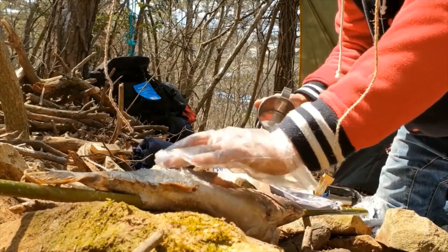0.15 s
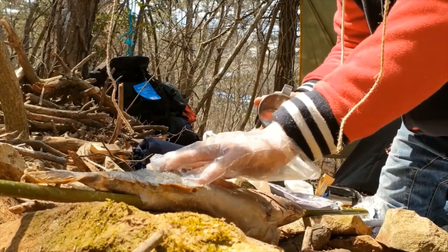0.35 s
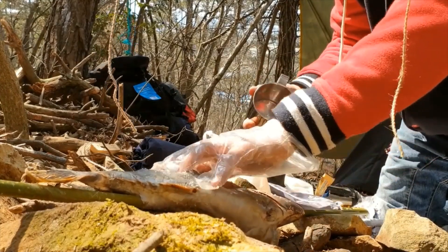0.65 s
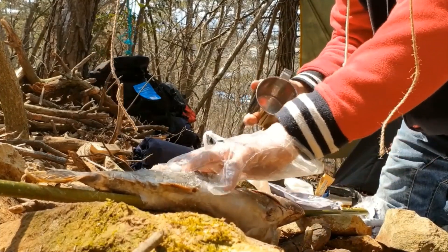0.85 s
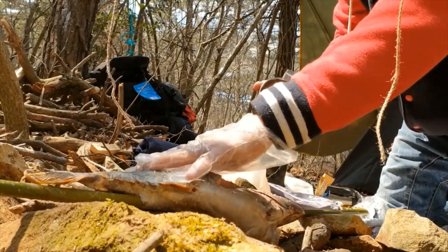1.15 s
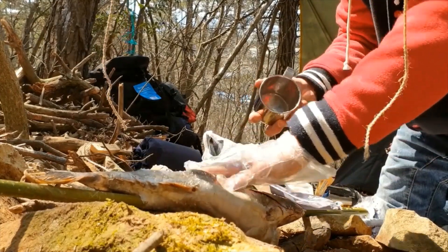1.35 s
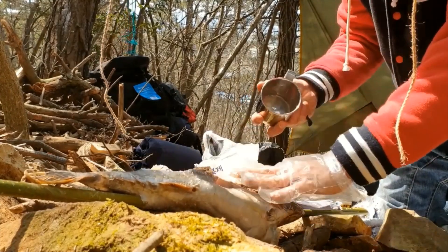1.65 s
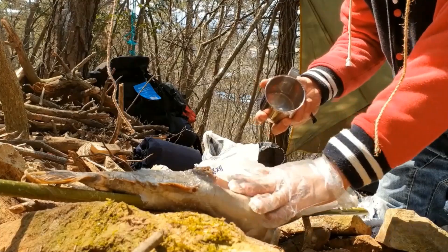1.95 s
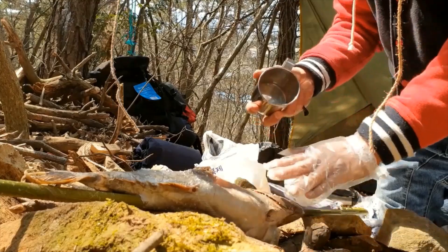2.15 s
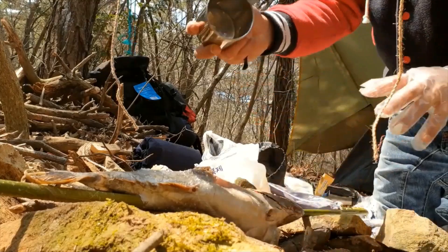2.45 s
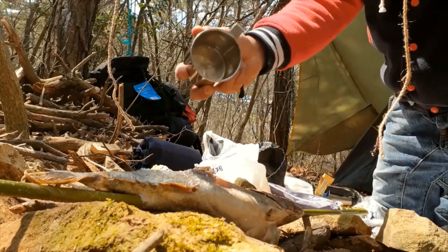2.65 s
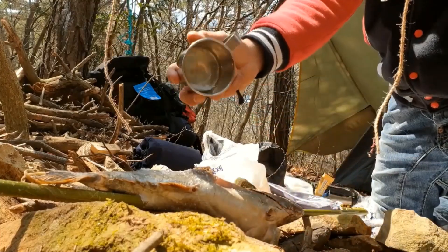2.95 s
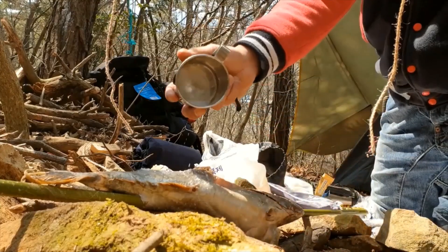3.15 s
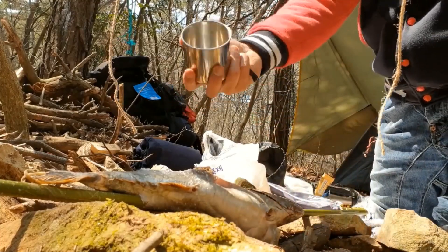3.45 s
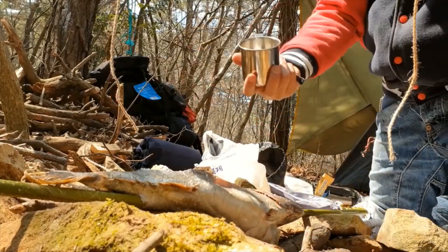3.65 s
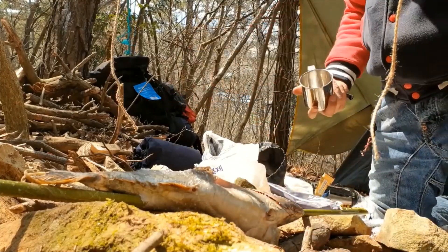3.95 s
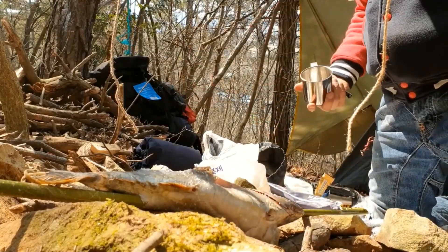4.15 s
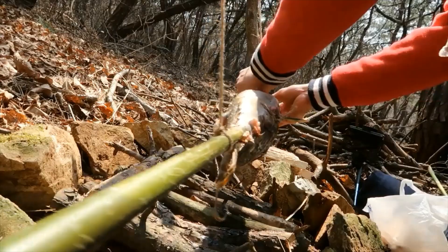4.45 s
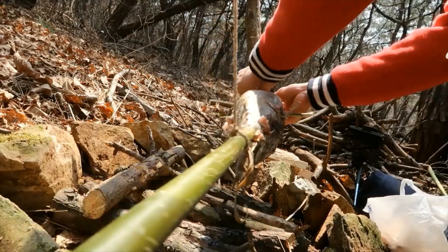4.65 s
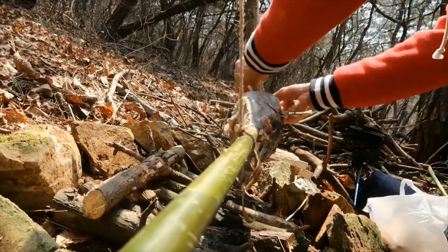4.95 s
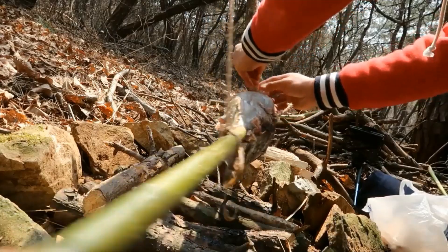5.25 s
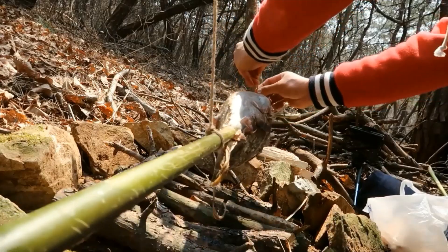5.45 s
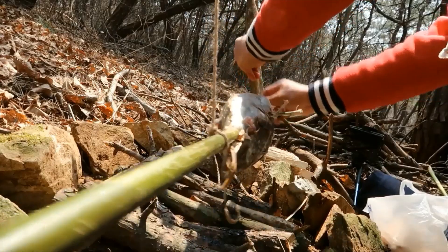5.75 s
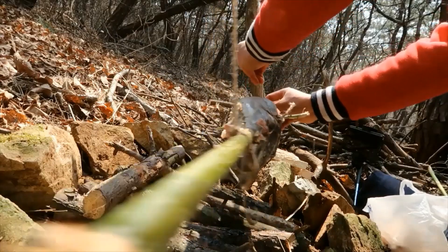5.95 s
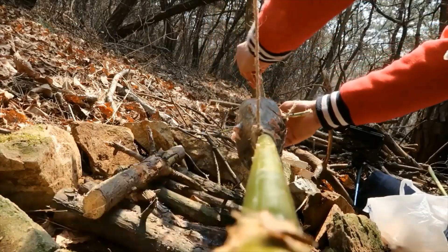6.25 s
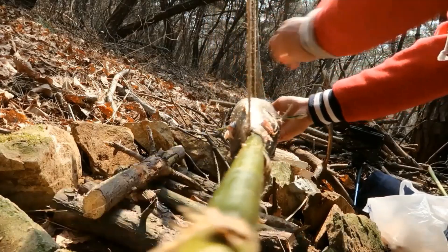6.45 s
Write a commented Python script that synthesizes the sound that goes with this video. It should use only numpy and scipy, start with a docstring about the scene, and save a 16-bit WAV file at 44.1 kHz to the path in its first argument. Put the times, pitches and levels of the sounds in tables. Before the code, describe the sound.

A thin plastic glove rustles and crackles over a fish, a steel cup clinks, then steady outdoor rushing with a few bird chirps.

```python
"""In a bare wood, a thin plastic glove rubs a fish on a spit, and its creases rustle and snap.
A steel cup rings as it is knocked, wind thumps mostly on the right microphone, and birds whistle
among the trunks. After a quick fade we hear the wood from a second spot, where a steady far rush
covers everything but a few chirps, a faint rustle and one cracking twig."""
import sys
import numpy as np
from scipy import signal
from scipy.fft import rfft, irfft, next_fast_len
from scipy.io import wavfile

SR = 44100
rng = np.random.default_rng(int(sys.argv[2]) if len(sys.argv) > 2 else 0)


def bounce(signal):
    """Save signal as a 16-bit WAV file at the path given by the first command-line argument."""
    frames = np.transpose(np.atleast_2d(signal))
    limited = np.clip(frames, -1, 1)
    pcm = np.round(limited * 32767).astype(np.int16)
    wavfile.write(sys.argv[1], SR, pcm)


N = 291501

# Levels are set before each source's own gain. pan_db is left minus right.
# Tone of the still air: pitch_hz, level_db
AIR_SPECTRUM = [(18, -32), (30, -1.5), (124, -1.5), (295, -9.5), (600, -18), (1040, -13.5), (1860, -38),
                (2610, -28.5), (3980, -35.5), (6380, -26.5), (8300, -69.5), (14800, -25), (16000, -38)]
# How alike the air sounds left and right (1 is the same): pitch_hz, likeness
AIR_LIKENESS = [(60, 1), (240, 0.92), (950, -0.096), (3770, 0.062), (15000, 0.064)]
# Far rush, a roar plus a hiss: time_s, roar_db, hiss_db
RUSH_LEVELS = [(4.6, -40.5, -52.5), (5.7, -40, -53), (6.25, -40, -51), (6.61, -40, -51)]
# Tone of the roar: pitch_hz, level_db
ROAR_SPECTRUM = [(20, -8), (96, 1), (241, -6), (337, -20), (542, -7.5), (1030, -8), (1570, -14),
                 (2320, -17.5), (2990, -24), (6540, -38), (8300, -43.5), (10000, -74.5), (16000, -84)]
# Tone of the hiss: pitch_hz, level_db
HISS_SPECTRUM = [(18, -28), (30, -22.5), (112, -24), (239, 0.5), (449, -0.5), (526, -0.5), (1250, -0.5),
                 (11700, -10), (14800, -19), (16000, -44)]

# Light air on both microphones: time_s, level_db
BREEZE_LEVELS = [(0, -60), (.9, -69), (1.3, -52.5), (2.1, -57.5), (2.5, -66), (3.3, -70), (3.9, -69.5),
                 (4.5, -62.5)]
# Gusts on the right microphone: full_at_s, rise_s, hold_s, fall_s, level_db
GUST_SWELLS = [(0, .01, .003, 0.042, -43.5), (.112, 0.012, 0.17, .02, -50), (.304, 0.035, .002, 0.018, -38),
               (.512, 0.044, 0.0038, 0.067, -45.5), (.63, .05, 0.0052, 0.12, -66),
               (.742, 0.052, .003, 0.1, -53.5), (1.114, 0.041, 0.0082, 0.029, -44.5),
               (1.22, 0.05, .003, 0.032, -53), (1.432, 0.052, .003, 0.062, -50),
               (1.582, 0.034, .003, 0.087, -48), (1.654, .03, 0.11, 0.031, -52.5),
               (1.824, 0.024, 0.092, .015, -48.5), (2.042, .1, .003, 0.068, -50),
               (2.172, 0.035, .003, 0.038, -52), (2.284, 0.088, 0.24, .1, -61),
               (2.81, 0.05, .018, .14, -61), (3.024, .025, .01, 0.037, -44),
               (3.07, 0.018, 0.2, .036, -48.5), (3.482, .018, .002, 0.02, -62),
               (3.558, .06, .003, .07, -61), (3.934, .2, .003, .03, -52.5),
               (3.968, 0.044, 0.0024, 0.038, -44.5), (4.074, .065, .002, .03, -43),
               (4.184, 0.17, 0.0018, 0.013, -53.5), (4.282, .042, 0.043, 0.2, -49.5)]
# Tone of the wind: pitch_hz, level_db
WIND_SPECTRUM = [(12, -33), (20, 0.5), (75, -3), (168, -13), (271, -19.5), (315, -23), (400, -30.5),
                 (520, -33), (880, -120)]
# Single pushes of air on the right microphone: start_s, level_db, pitch_hz
WIND_THUMPS = [(0.29, -54, 62), (0.508, -39, 72.6), (1.417, -32, 78.1), (1.46, -30.5, 118),
               (1.658, -30, 76), (1.818, -29.5, 75), (2.04, -32, 64.6), (2.171, -41, 96.9),
               (3.018, -36, 83), (3.248, -34, 88), (3.971, -29, 107), (4.007, -34, 57.3),
               (4.039, -40, 78.1), (4.058, -36, 79), (4.288, -35, 40.4)]

# Bird notes: start_s, length_s, first_hz, last_hz, closing_flick_hz, end_db, swell_db
BIRD_NOTES = [(2.355, 0.098, 3900, 2720, 0, -73, -3), (3.108, 0.075, 3770, 3400, 0, -76, -6),
              (3.236, 0.074, 3880, 3700, 0, -75, -3), (3.564, 0.076, 3800, 2950, 0, -70, 4),
              (3.65, 0.038, 3680, 3540, -250, -72.5, -7), (3.811, 0.056, 4200, 4870, -460, -62.5, 10),
              (3.863, 0.092, 3800, 4180, -400, -63.5, 2.5), (4.07, 0.12, 3550, 4660, -780, -59.5, 11),
              (4.195, .012, 5160, 4250, 0, -59, 3), (4.208, 0.025, 4400, 5030, 0, -67.5, -4),
              (4.218, 0.079, 3750, 3030, 0, -79.5, -6), (4.365, 0.14, 3620, 5380, -1700, -57, 8.5),
              (5.36, 0.032, 3600, 6350, 0, -56, 5), (5.39, .118, 6200, 6650, -2000, -59.5, 1.5),
              (5.44, 0.082, 3770, 4760, 0, -54.5, 1.5), (5.537, 0.036, 6280, 3650, 8, -52, 11),
              (5.77, 0.065, 3800, 4210, 0, -58, 8), (6.04, 0.056, 3900, 4140, -2, -60, 4),
              (6.5, 0.082, 6750, 7200, 0, -65.5, -4), (6.532, 0.076, 3520, 3620, 0, -47.5, 11)]
# The tones in a bird's voice: pitch_multiple, level_db
BIRD_TONES = [(1, 0), (1.5, -20), (2, -21)]
# A faint rustle at the spit: full_at_s, rise_s, hold_s, fall_s, level_db
RUSTLE_SWELLS = [(5.725, .04, .05, .04, -74)]
# The bursts of one twig crack: start_s, level_db, pitch_hz, decay_s, pan_db
TWIG_BURSTS = [(6.269, -41, 4000, 0.033, -4), (6.2743, -38.5, 5370, 0.013, 8),
               (6.275, -42, 9200, 0.012, -3), (6.276, -31, 2800, 0.062, -3), (6.289, -29, 800, 0.014, -1),
               (6.291, -35, 2600, 0.061, 0)]

# Knocks on the cup: start_s, level_db, extra_air_note_db, extra_rim_db, pan_db
CUP_KNOCKS = [(2.5256, -63.5, -2, -4, -8), (2.875, -74, 0, -17, -2.5), (2.976, -64, -12, -8, 3),
              (2.999, -63.5, -9, 2, 0.5), (3.022, -64, -7, -14, -5), (3.045, -66, -6, -4, -6),
              (3.6172, -54, 5, 11.5, 4.5), (3.6423, -65, 6, -3, -5), (3.697, -71.5, 17.5, 1, 1),
              (3.7042, -77, 7, 10, -7), (3.7152, -78, 9, 1, 0), (4.3518, -68, 9.5, -2, 2)]
# The cup's tones (first its air note, last four its rim): pitch_hz, level_db, decay_s
CUP_TONES = [(1030, 1, .045), (1630, -7, .03), (2280, 0, .035), (3070, -2, .035), (3800, -9, .03),
             (5950, -10, .035), (7000, -12, .03)]

# Tone of the plastic film: pitch_hz, level_db
FILM_SPECTRUM = [(260, -38), (450, -5.5), (625, -5.5), (794, -16), (1210, -8), (1530, -4.5), (3050, -4.5),
                 (6340, -0.5), (8290, -9), (15100, -4), (16000, -10)]
# Rubs of the glove: full_at_s, rise_s, hold_s, fall_s, rustle_db, extra_body_db, extra_sizzle_db
GLOVE_STROKES = [(0.013, 0.019, 0.12, 0.035, -48, -1, -1.5), (0.192, 0.033, 0.013, 0.11, -45.5, 0, 0.5),
                 (0.384, 0.053, 0.021, 0.076, -46.5, -2.5, -2), (.454, .01, .005, 0.088, -52.5, 2.5, -3),
                 (0.55, 0.051, .04, .1, -51, 0.5, 0.5), (0.676, .1, 0.036, 0.054, -63, 0, 2),
                 (0.76, 0.046, 0.0093, 0.18, -60, -20, -3), (0.901, 0.075, 0.061, .07, -49.5, -0.5, 0.5),
                 (1.059, 0.1, .005, .09, -53.5, 1, 1.5), (1.141, 0.054, .005, 0.084, -46, -3, 0),
                 (1.3, 0.19, 0.032, .05, -44.5, 1, 1.5), (1.344, 0.044, 0.011, 0.21, -39, -2, -2),
                 (1.511, .05, .01, 0.052, -52.5, 2, 0.5), (1.665, 0.098, 0.0026, 0.073, -52, 3.5, -2),
                 (1.779, 0.025, .05, .05, -46.5, -3.5, -3), (1.853, 0.028, .003, 0.1, -40.5, -9.5, -6),
                 (1.922, 0.092, 0.011, .14, -43.5, -1, 0), (2.0, 0.065, 0.11, 0.047, -51.5, 0, -5),
                 (2.246, 0.092, 0.18, 0.095, -58.5, -4, -4), (2.531, 0.031, 0.0027, 0.018, -49, -13, 4.5),
                 (2.565, .03, 0.12, 0.059, -68, -13, 5.5), (2.698, .01, 0.0018, .01, -66, -25, -1),
                 (2.76, 0.071, .002, 0.011, -70, -20, 4), (2.868, 0.014, 0.022, 0.04, -56.5, -35, 9),
                 (2.978, .03, 0.021, .02, -61, -21, 1), (3.023, 0.014, .002, 0.022, -47.5, -36, 4),
                 (3.095, 0.033, .003, 0.024, -61, -8, -2), (3.139, 0.022, .003, 0.049, -52.5, -30, 3.5),
                 (3.306, 0.11, .002, 0.038, -61.5, -22, -2), (3.449, 0.0067, .002, 0.013, -62, -25, -4),
                 (3.6, .085, .01, .02, -62, -25, -10), (3.617, 0.01, .002, .01, -48.5, -13, -2.5),
                 (3.627, .01, 0.081, 0.082, -61, -3, -1), (3.887, 0.077, 0.068, 0.074, -60.5, -5, -23),
                 (4.09, 0.21, .003, .08, -69, 1, -15), (4.194, .008, 0.069, 0.1, -64, -3, -13),
                 (4.354, 0.011, 0.0034, 0.016, -42, -35, -8), (4.389, .01, .003, 0.092, -60, -3, -5),
                 (4.482, .022, .003, 0.048, -68, -22, -22)]
# The glove between rubs: body_db, rustle_db, sizzle_db
GLOVE_REST = [-91, -87, -77]
# Where the rubbing is heard: time_s, pan_db
GLOVE_POSITION = [(0, -.5), (2.1, -2), (2.7, -1.5), (4.5, -2.5)]
# The loudest creases snapping: start_s, level_db, extra_sizzle_db, pan_db
CREASE_SNAPS = [(.0097, -31, -17, .5), (.0578, -37, -15, 4), (0.069, -38, 4, 0), (.111, -35, -8, -2),
                (.134, -37, -12, 0), (.1807, -33, 5, 1), (0.2048, -31, 0, 1), (.2324, -39, -7, -2),
                (.2566, -37, 4, 3), (0.3581, -32.5, 2, -1.5), (.374, -31, -9, 3), (.409, -31, 2, 2),
                (0.4542, -27, -2, 0), (.459, -30, 3, 3), (0.576, -37, -2, -.5), (.6516, -40.5, 0, 3),
                (0.7058, -44.5, -4, 17.5), (0.7713, -35.5, -7, -5), (.7936, -46, -3, -5),
                (.831, -47, -3, -4), (0.857, -39.5, -14, -1.5), (.9144, -35, -3, 1), (0.9568, -36, 1, -1.5),
                (1.0372, -39, -10, -8), (1.1847, -44, -8, 1), (1.223, -32, -13, .5), (1.3633, -28, -15, -1),
                (1.4344, -35, -16, -2), (1.4604, -35, -19, -1.5), (1.539, -36, 3, -4), (1.596, -38, 4, -1),
                (1.616, -39, -10, -10), (1.6641, -29, -9, -5), (1.7406, -34.5, -6, -1),
                (1.7829, -36, -18, -12), (1.798, -27.5, -5, 0), (1.8496, -28, -14, -6),
                (1.857, -30, -17, -8), (1.873, -32, -11, -2), (1.9096, -40, -5.5, -4),
                (2.2414, -44.5, 14, -4), (2.2628, -37.5, 1, 0), (2.289, -40, -7, -2.5),
                (2.309, -41.5, -2, -5), (2.3607, -38, -3, -1), (2.3975, -39, -4, -10),
                (2.5258, -40, 19.5, -1), (2.5985, -45, -13, -11), (2.697, -46.5, -3, -8),
                (2.7517, -52, -1, -15), (2.867, -55, 19, 0), (2.9191, -49, 0, -13),
                (3.0244, -38.5, 13.5, -3), (3.13, -50, 8, 0), (3.2824, -54, -10, -4), (3.296, -44.5, 0, -9),
                (3.4475, -49.5, -3, -14.5), (3.6175, -30.5, 4, -3), (3.6445, -38, -17, 2),
                (3.7037, -45, -1, 1), (4.3515, -34, -9, 2.5)]

# A decay is the time a sound takes to drop by 60 dB.
FOLD_DECAY_S, SNAP_DECAY_S, TICK_DECAY_S, SNAP_RISE_S = .005, .01, .0025, .00086
BODY_HZ, RUSTLE_HZ, SIZZLE_HZ = 1800, 6000, 12000   # the glove's low, middle and high parts
SNAP_BODY_DB, GUST_LEFT_DB, GUST_FLUTTER_DB, BREEZE_DEEP_DB = -26, -30, -7.5, -13.5
FLICK_S, FLICK_LOSS_DB = .013, 6   # the quick bend that ends some bird notes
SWELL_DB = 15   # change in level over one rise or fall time
FADE_OUT_S, FADE_IN_S = (4.505, 4.535), (4.54, 4.572)
CUTOFF_HZ = 16550


def amp(db):
    """Turn decibels into a gain to multiply by."""
    return 10 ** (np.asarray(db) / 20)


def rms_one(x):
    """Scale a signal so that its average strength (rms) is 1."""
    return x / np.sqrt(np.mean(x ** 2) + 1e-20)


def filtered(x, order, hz, kind):
    """Keep the lows, the highs or one band of a sound."""
    return signal.sosfilt(signal.butter(order, hz, kind, fs=SR, output="sos"), x)


def in_time(rows):
    """Join a table's points in time into one curve per column."""
    times, *columns = np.transpose(rows)
    return [np.interp(np.arange(N) / SR, times, column) for column in columns]


def at_hz(points, hz):
    """Read a table's value at any pitch."""
    pitches, values = np.transpose(points)
    return np.interp(np.log(hz), np.log(pitches), values)


def sides(pan_db):
    """Left and right gains that lie pan_db apart."""
    return amp(np.array([pan_db / 2, -pan_db / 2]))


def drift(rate_hz):
    """A smooth random wobble of typical size 1, worked out every 40th sample."""
    r = np.exp(-80 * np.pi * rate_hz / SR)
    slow = signal.lfilter([1], [1, -2 * r, r * r], rng.standard_normal(N // 40 + 2002))[2000:]
    return np.interp(np.arange(N) / 40, np.arange(len(slow)), rms_one(slow))


def bands(spectrum, low_hz, count):
    """Stereo noise in half-octave bands: yields each centre pitch and its band."""
    white = rng.standard_normal((2, 2, N))
    for k, low in enumerate(low_hz * 2 ** (np.arange(count) / 2)):
        high = min(low * np.sqrt(2), .45 * SR)
        hz = np.sqrt(low * high)
        yield hz, amp(at_hz(spectrum, hz)) * filtered(white[k % 2], 2, [low, high], "band")


def coloured(spectrum):
    """Two unrelated noises with the given tone, each of strength 1."""
    size = next_fast_len(N)
    hz = np.maximum(np.fft.rfftfreq(size, 1 / SR), 1)
    white = rfft(rng.standard_normal((2, size)))
    noise = irfft(white * amp(at_hz(spectrum, hz)), size)[:, :N]
    return np.array([rms_one(side) for side in noise])


def swells(rows):
    """The power of each swell as it rises, holds and falls, at every 32nd sample."""
    t = np.arange(N // 32 + 2) * 32 / SR
    full_at, rise, hold, fall, db = np.transpose(rows)[:5, :, None]
    before = np.maximum((full_at - t) / rise, 0)
    after = np.maximum((t - full_at - hold) / fall, 0)
    return amp(2 * np.maximum(db - SWELL_DB * (before + after), -150))


def summed(power):
    """Add the swells' powers into one loudness curve."""
    return np.sqrt(np.interp(np.arange(N) / 32, np.arange(power.shape[1]), power.sum(axis=0)))


def ring(clicks, hz, decay_s):
    """Each click starts a pure tone that dies away."""
    r, step = amp(-60 / (decay_s * SR)), 2 * np.pi * hz / SR
    return signal.lfilter([0, np.sin(step)], [1, -2 * r * np.cos(step), r * r], clicks + 1e-18)


def still_air():
    """Faint far rumble and hiss, more alike left and right in the bass."""
    out, together = 0, drift(3.5)
    for hz, (middle, side) in bands(AIR_SPECTRUM, 30.17, count=18):
        alike = at_hz(AIR_LIKENESS, hz)
        stereo = np.sqrt(1 + alike) * middle + np.sqrt(1 - alike) * side * [[1], [-1]]
        out += amp(1.5 * (.24 * together + drift(22))) * stereo
    return amp(-57.5) * rms_one(out)


def far_rush():
    """A wavering roar shared by both sides, and a hiss that is flipped in sign on the right."""
    roar_db, hiss_db = in_time(RUSH_LEVELS)
    noise = coloured(ROAR_SPECTRUM)[0]
    bass, upper = (rms_one(filtered(noise, 4, 340, kind)) for kind in ("low", "high"))
    roar = amp(roar_db) * (amp(.64 * drift(8.4)) * upper + amp(1.5 + 1.4 * drift(5.9)) * bass)
    hiss = amp(hiss_db) * coloured(HISS_SPECTRUM)[0]
    return np.array([roar + hiss, roar - hiss])


def wind():
    """Air rumbles and flutters on the microphones; single pushes thump the right one."""
    gust = summed(swells(GUST_SWELLS)) * amp([[GUST_LEFT_DB], [0]])
    breeze = amp(*in_time(BREEZE_LEVELS)) / np.sqrt(2)
    lumps = amp(2 * np.array([drift(11), drift(39)]))
    noise = coloured(WIND_SPECTRUM)
    deep, upper = (rms_one(filtered(noise, 4, 100, kind)) for kind in ("low", "high"))
    rumble = np.hypot(gust, amp(BREEZE_DEEP_DB) * breeze) * deep
    flutter = np.hypot(amp(GUST_FLUTTER_DB) * gust, breeze) * upper
    out = 2 * lumps * (rumble + flutter)
    for start_s, db, hz in WIND_THUMPS:
        t = np.arange(round(1.5 * SR / hz)) / SR   # one and a half swings
        thump = np.sin(2 * np.pi * hz * t) * np.exp(-1.5 * hz * t) * signal.windows.tukey(len(t), .25)
        at = round(start_s * SR)
        out[1, at:at + len(t)] -= 2 * amp(db) * thump
    return out


def birds():
    """Husky sliding whistles that echo off the trunks. Returns their sound at each of the two spots."""
    calls = np.zeros(N)
    waver, husk = drift(150), 1 + .55 * drift(250)
    for start_s, length_s, first_hz, last_hz, flick_hz, end_db, swell_db in BIRD_NOTES:
        start, end = round(start_s * SR), min(round((start_s + length_s) * SR), N)
        progress = np.linspace(0, 1, end - start)
        closing = np.maximum(1 - (1 - progress) * length_s / FLICK_S, 0)
        arch_hz = .4 * abs(last_hz - first_hz) * progress * (1 - progress)
        hz = first_hz + (last_hz - first_hz) * progress + arch_hz + flick_hz * closing
        db = end_db - swell_db * (1 - progress) - FLICK_LOSS_DB * closing
        hoarseness = .035 if last_hz < .92 * first_hz else .007   # steeply falling notes waver more
        phase = 2 * np.pi * np.cumsum(hz * (1 + hoarseness * waver[start:end])) / SR
        tone = sum(amp(tone_db) * (multiple * hz < 8500) * np.sin(multiple * phase)
                   for multiple, tone_db in BIRD_TONES)
        edges = signal.windows.tukey(end - start, .008 * SR / (end - start))
        calls[start:end] += np.sqrt(2) * amp(db) * edges * husk[start:end] * tone
    t = np.arange(round(.25 * SR)) / SR
    trunks = rng.standard_normal((2, len(t))) / np.sqrt(.022 * SR) * amp(-10 - 60 * t / .3)
    echo = signal.fftconvolve(calls[None], trunks, axes=1)[:, :N]
    from_side = np.array([calls, np.roll(calls, 3)])   # reaches the right 3 samples late
    return amp(8) * (from_side + echo), calls + echo[0]


def faint_rustle():
    """A brief, soft, high hiss at the spit."""
    hiss = filtered(rng.standard_normal(N), 2, (8000, 15000), "band")
    return summed(swells(RUSTLE_SWELLS)) * rms_one(hiss)


def twig():
    """A twig on the spit cracks in a few quick bursts of noise, each around its own pitch."""
    out, t = np.zeros((2, N)), np.arange(2000) / SR
    for start_s, db, hz, decay_s, pan_db in TWIG_BURSTS:
        burst = rng.standard_normal((2, len(t))) * amp(-60 * t / decay_s)
        burst = filtered(burst, 2, [hz / 2, hz * 1.45], "band")
        at = round(start_s * SR)
        out[:, at:at + len(t)] += 2 * amp(db) * sides(pan_db)[:, None] * burst
    return out


def cup():
    """Each knock chatters and rings the steel cup; where it lands sets the mix of air note and rim."""
    start_s, db, air_db, rim_db, pan_db = np.transpose(CUP_KNOCKS)
    chance_db = rng.normal(0, 1, (len(start_s), len(CUP_TONES)))
    out, t = 0, np.arange(2400) / SR
    for k, (hz, tone_db, decay_s) in enumerate(CUP_TONES):
        strike_db = db + tone_db + chance_db[:, k] + air_db * (k == 0) + rim_db * (k > 2)
        clicks = np.zeros((2, N))
        clicks[:, (start_s * SR).astype(int)] = amp(strike_db) * sides(pan_db)
        chatter = .21 * rng.standard_normal((2, len(t))) * amp(-60 * t / .085)
        chatter[:, 0] = 1   # the knock itself
        out += ring(signal.oaconvolve(clicks, chatter, axes=1)[:, :N], hz, decay_s)
    return out


def tiny_folds(base_per_s, spread_db):
    """Loudness curve of tiny folds giving way in random clumps."""
    sizes = amp(spread_db * np.minimum(rng.exponential(1, N), 4))
    clicks = sizes * (rng.random(N) < base_per_s * amp(4 * drift(25)) / SR)
    return rms_one(signal.lfilter([1], [1, -amp(-60 / (FOLD_DECAY_S * SR))], clicks + 1e-18))


def crease_snaps():
    """Body, rustle and sizzle loudness of big creases snapping: a sharp tick, then a short tail."""
    out, t = np.zeros((3, 2, N)), np.arange(1500) / SR
    tick = amp(1 - 60 * t / TICK_DECAY_S)
    tail = amp(-60 * t / SNAP_DECAY_S) * np.minimum(t / SNAP_RISE_S, 1)
    for start_s, db, sizzle_db, pan_db in CREASE_SNAPS:
        gains = amp(db + np.array([SNAP_BODY_DB, 0, sizzle_db]))
        at = round(start_s * SR)
        out[:, :, at:at + len(t)] += gains[:, None, None] * sides(pan_db)[:, None] * (tick + tail)
    return amp(-5.5) * out


def glove():
    """Plastic film hisses as it rubs and crackles as it folds; both sides hear the same folds."""
    strokes = swells(GLOVE_STROKES)
    body_db, sizzle_db = np.transpose(GLOVE_STROKES)[5:, :, None]
    parts = [np.hypot(summed(strokes * amp(2 * db)), amp(rest_db))
             for db, rest_db in zip([body_db, 0, sizzle_db], GLOVE_REST)]
    rubbing = np.array(parts)[:, None] * sides(*in_time(GLOVE_POSITION))
    snaps, shared_folds = crease_snaps(), tiny_folds(base_per_s=390, spread_db=5.5)
    out, power = 0, 0
    for hz, noise in bands(FILM_SPECTRUM, 479, count=10):
        # how much of this band is body, rustle and sizzle
        share = [np.interp(np.log(hz), np.log([BODY_HZ, RUSTLE_HZ, SIZZLE_HZ]), row) for row in np.eye(3)]
        folds = 1 + .36 * shared_folds + .3 * tiny_folds(base_per_s=250, spread_db=1)
        bending = amp(1.93 * drift(14.4))   # the band swells as the film bends
        level = np.tensordot(share, rubbing, 1) * rms_one(folds * bending) + np.tensordot(share, snaps, 1)
        out += noise * level * sides(np.array([2 * share[2]]))   # the sizzle leans left
        power += np.mean(noise ** 2)
    return amp(5) * out / np.sqrt(power)


def scene():
    """The first spot fades out, then the second fades in."""
    t = np.arange(N) / SR
    birds_aside, birds_ahead = birds()
    first_spot = glove() + cup() + wind() + still_air() + birds_aside
    second_spot = far_rush() + twig() + faint_rustle() + birds_ahead
    return np.interp(t, FADE_OUT_S, [1, 0]) * first_spot + np.interp(t, FADE_IN_S, [0, 1]) * second_spot


def record(dry):
    """Cut away the very highest treble."""
    return signal.sosfilt(signal.cheby2(16, 70, CUTOFF_HZ, fs=SR, output="sos"), dry)


dry = scene()
out = record(dry)
bounce(out)
```